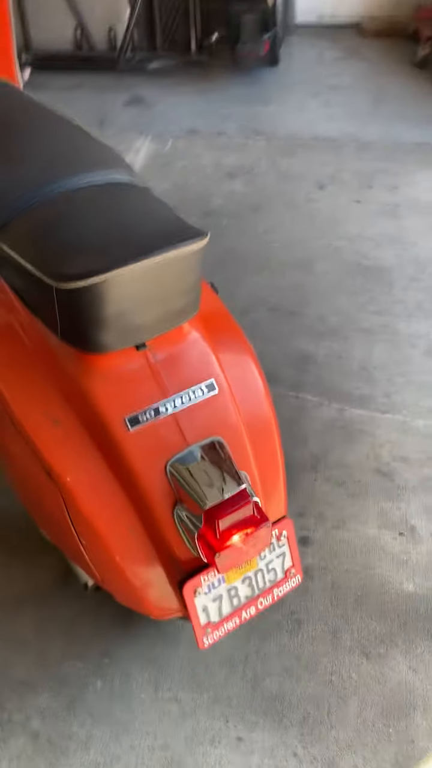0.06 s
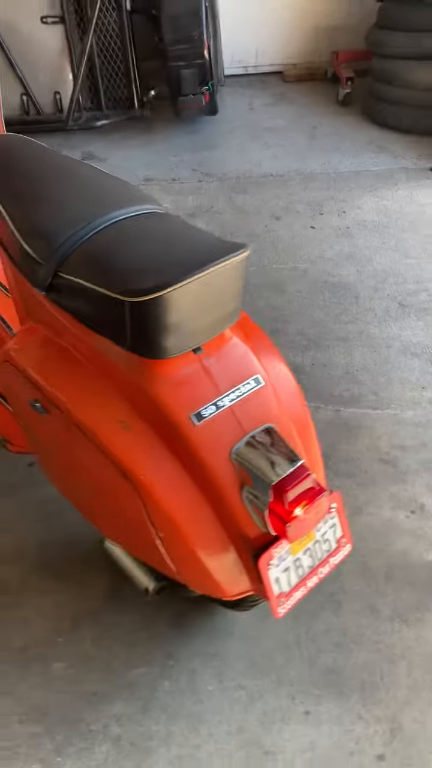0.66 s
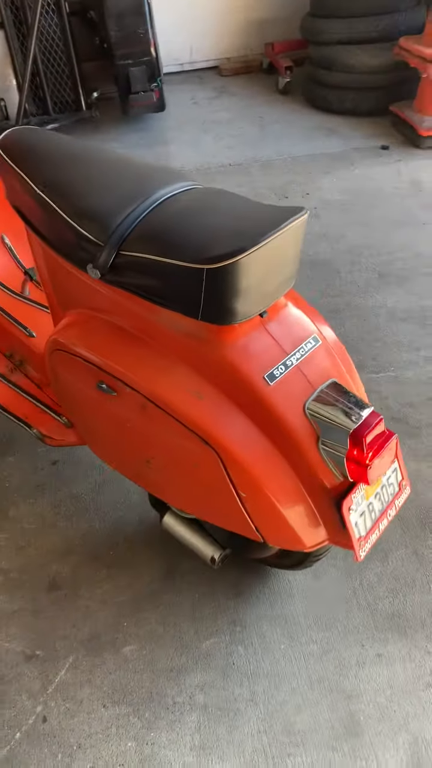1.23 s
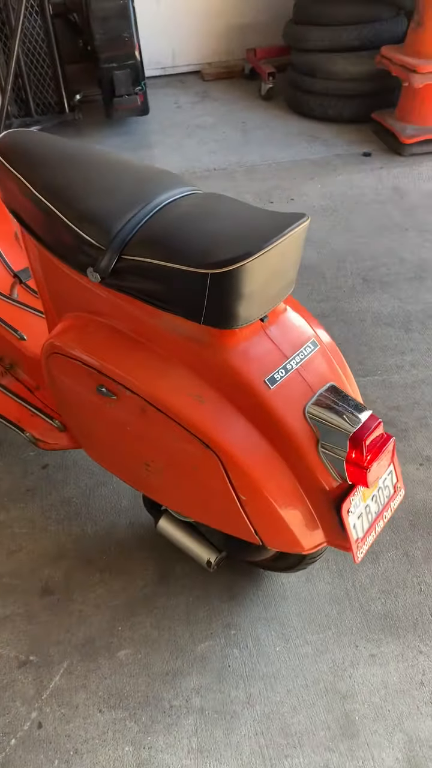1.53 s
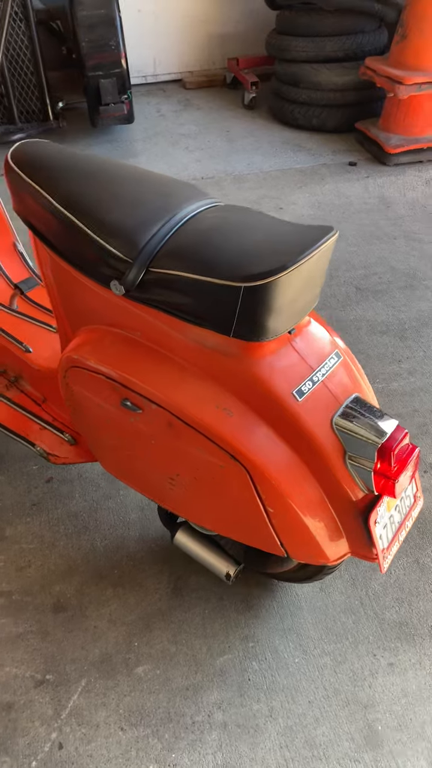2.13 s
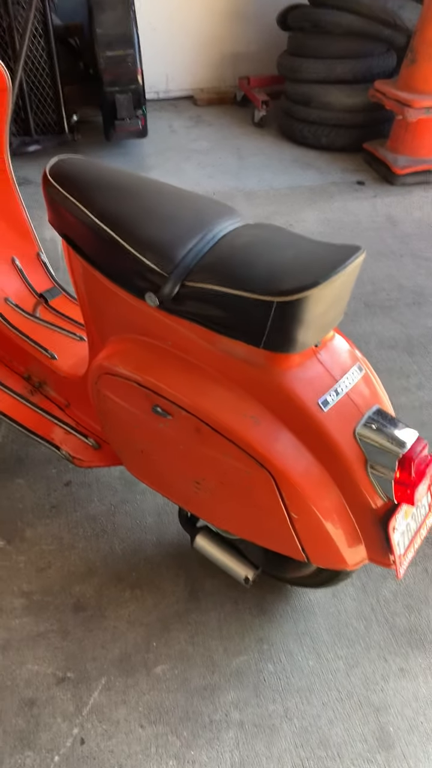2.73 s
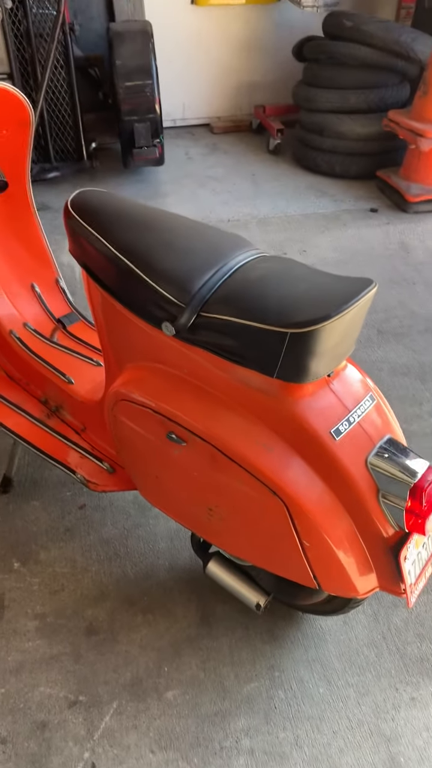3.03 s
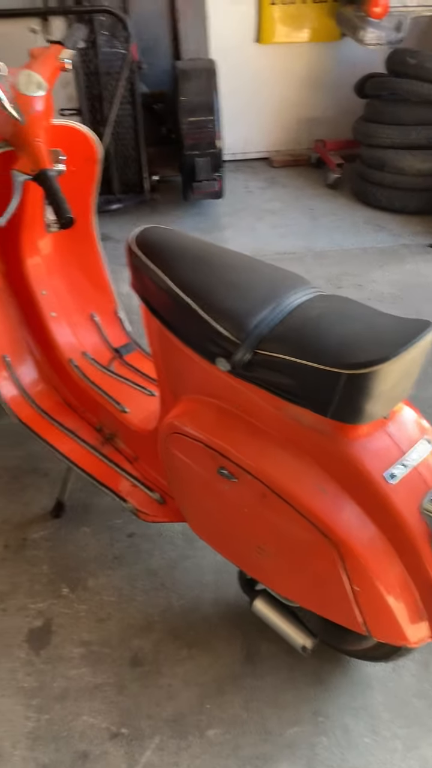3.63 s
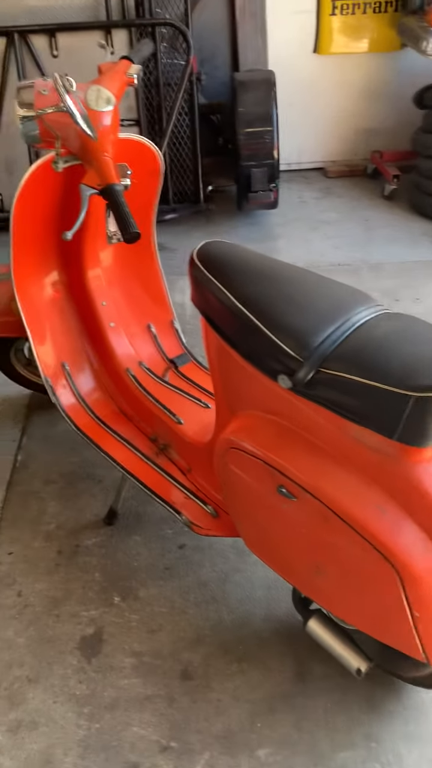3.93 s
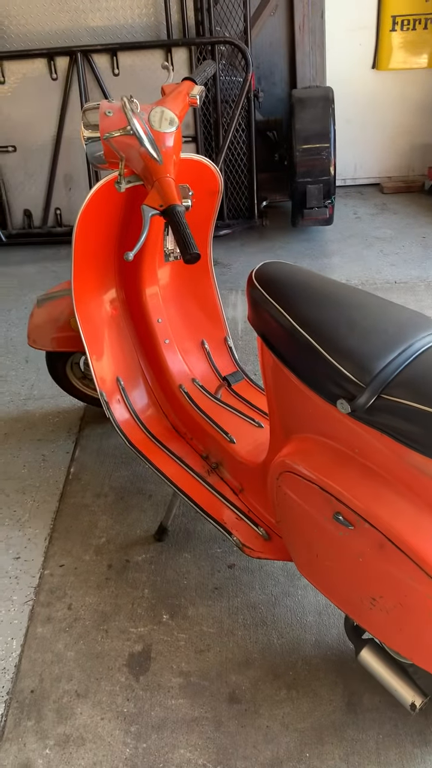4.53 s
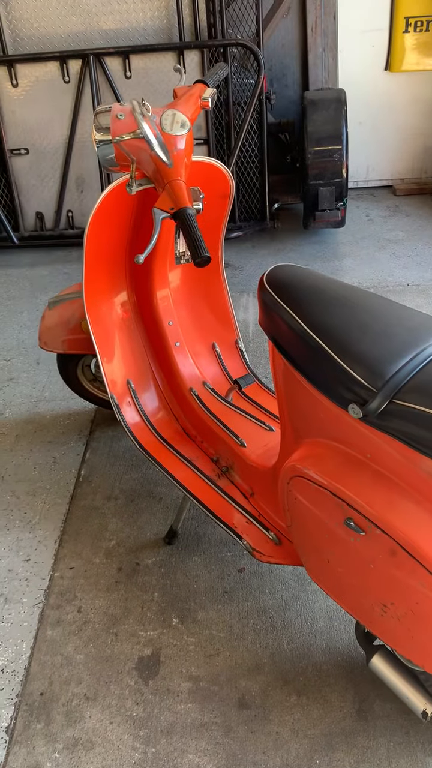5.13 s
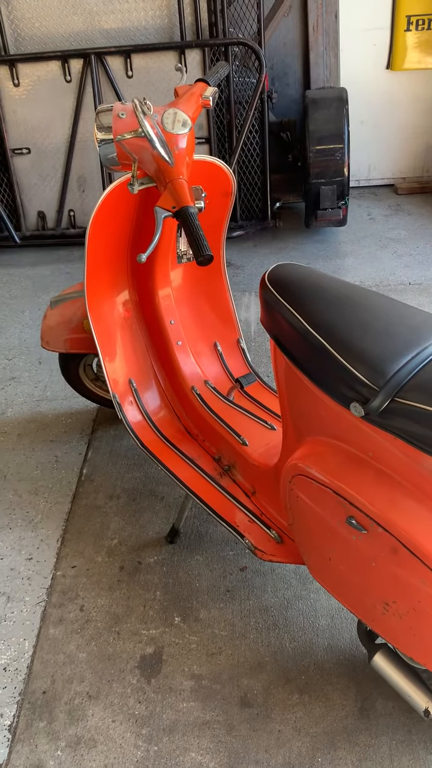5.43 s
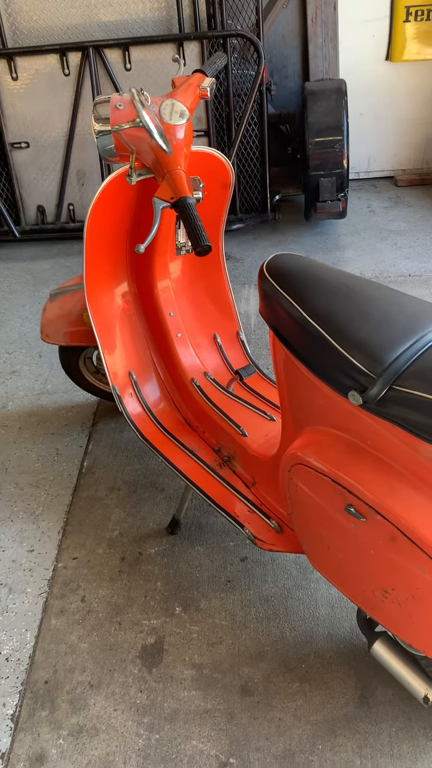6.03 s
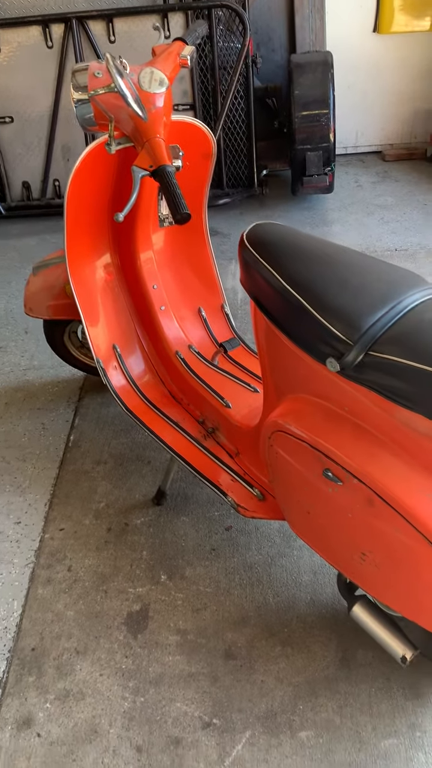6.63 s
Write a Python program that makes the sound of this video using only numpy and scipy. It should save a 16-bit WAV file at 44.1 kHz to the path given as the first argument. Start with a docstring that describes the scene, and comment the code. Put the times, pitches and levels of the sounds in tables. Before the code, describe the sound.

Close by, a two-stroke scooter engine ticks over with a ragged, sputtering pop from the tailpipe, backed by metallic knocking and fan noise. The garage answers with a low boom and short, dull echoes. As the microphone travels from the rear round to the side, the bass changes colour and widens, and a faint, high rattle comes and goes. The idle keeps the same speed throughout.

```python
"""Scooter idling in a garage

A small two-stroke scooter idles while a phone moves from behind it round to its side.
The crank turns about 26 times a second but only some turns fire: each firing pops through
the exhaust with a bark and a spit of gas. Piston and cooling fan clatter on, a loose part
buzzes, and the garage booms along."""
import sys
import numpy as np
from scipy import signal
from scipy.fft import rfft, irfft
from scipy.io import wavfile
from scipy.ndimage import uniform_filter1d

SR = 44100
rng = np.random.default_rng(int(sys.argv[2]) if len(sys.argv) > 2 else 0)


def generate_wav(sig):
    """Save sig (samples, or channels by samples) to the path in sys.argv[1] as 16-bit PCM at SR."""
    pcm = np.round(np.clip(np.atleast_2d(sig).T, -1, 1) * 32767).astype(np.int16)
    wavfile.write(sys.argv[1], SR, pcm)


N = 298557
TIME = np.arange(N) / SR
TURN_S = .0386  # one turn of the crank
SIZE = 65536  # filter length in samples
FREQ = np.arange(SIZE // 2 + 1) * SR / SIZE


def undb(db):
    """Turn decibels into a gain to multiply by."""
    return 10 ** (np.asarray(db) / 20)


def unit(x):
    """Scale a signal to an average (rms) level of 1."""
    return x / np.sqrt(np.mean(x ** 2))


def through(x, response):
    """Filter a sound by a frequency response, one row for each channel."""
    taps = np.roll(irfft(np.atleast_2d(response)), SIZE // 2, axis=1)
    filtered = signal.fftconvolve(np.atleast_2d(x), taps, axes=1)
    return np.squeeze(filtered[:, SIZE // 2:SIZE // 2 + N])


def colour(points):
    """Gain at every frequency, from (frequency [Hz], level [dB]) points."""
    hz, db = np.transpose(points)
    return undb(np.interp(np.log(FREQ + 1), np.log(hz), db))


def noise(points):
    """Noise with the given tone colour, at an average level of 1."""
    return unit(through(rng.standard_normal(N), colour(points)))


def resonance(hz, width):
    """Response of something that rings at one pitch, with gain 1 there."""
    return 1j * FREQ * width / (hz ** 2 - FREQ ** 2 + 1j * FREQ * width)


def strikes(times, sizes):
    """One sharp kick at each time."""
    return np.bincount(np.clip(times * SR, 0, N).astype(int), sizes, minlength=N + 1)[:N]


def swell(rise_ms):
    """A loudness curve that climbs to 1 and dies away."""
    progress = TIME[:SR // 4] * 1000 / rise_ms
    return progress * np.exp(1 - progress)


def ring(hz, rise_ms):
    """A tone that swells through the silencer's chambers and dies within a few cycles."""
    return swell(rise_ms) ** 3 * np.sin(2 * np.pi * hz * TIME[:SR // 4])


def play(kicks, shape):
    """Every kick sets off the same shape."""
    return signal.fftconvolve(kicks, shape)[:N]


def place_at(times):
    """Where the phone is: 0 behind the scooter, 1 at its corner, 2 and up beside it."""
    # the walk round the scooter: (time [s], place)
    walk = [(0, 0.047), (2.9, 0.28), (3.5, 0.46), (4.0, 0.58), (4.5, 1.4), (5.0, 1.82), (6.77, 2.49)]
    return np.interp(times, *np.transpose(walk))


def rumble(level_db=-38, db_per_place=-2):
    """Low sound that has bounced round the garage many times, fainter beside the scooter."""
    # (frequency [Hz], relative level [dB])
    tone = [(25, -20), (42, -3.5), (60, -1), (90, -4), (130, 4), (170, -2), (230, 1), (310, -1),
            (500, -24), (1500, -84)]
    return undb(level_db + db_per_place * place_at(TIME)) * noise(tone)


def reverberation(x, apart_hz=1100, stretches=14, fade_s=.38):
    """The garage rings on, changing as the phone moves; left and right are alike only in the bass."""
    # (frequency [Hz], level [dB])
    tone = colour([(100, -4.5), (330, -1.5), (480, -5.5), (800, -4), (1400, -11.5), (2400, 4.5),
                   (3300, 3), (4500, -10.5), (6500, -8.5), (10000, -21.5), (15000, -14)])
    fade = np.exp(-np.log(1000) * TIME[:SIZE // 2] / fade_s)  # 60 dB down after fade_s
    apart = np.minimum(FREQ / apart_hz, 1) * np.array([[1], [-1]])
    hop = N // stretches + 1
    out = np.zeros((2, N + 2 * SIZE))
    for centre in range(0, N + hop, hop):  # each overlapping stretch gets its own tail
        span = np.arange(max(centre - hop, 0), min(centre + hop, N))
        tail = rng.standard_normal((2, len(fade))) * fade
        mid, side = rfft(unit(tail) / np.sqrt(2 * len(fade)), SIZE) * tone
        stretch = x[span] * np.cos(np.pi / 2 * (span - centre) / hop)
        out[:, span[0]:span[0] + SIZE] += irfft(rfft(stretch, SIZE) * (mid + apart * side))
    return out[:, :N]


def walls(x, dull_hz=557):
    """The walls boom at some pitches and throw back dull echoes; both change from place to place."""
    # standing waves, the garage's own notes:
    # (pitch [Hz], width [Hz], level behind [dB], at the corner [dB], beside [dB])
    waves = [(54.6, 2.6, 2.5, 2.5, 11.5), (75.5, 5.5, 9.5, 14, 12), (98, 22, 0, -11, 3.5),
             (117.7, 6.6, 4, 9.5, 3.5), (147.3, 23.5, 8, 10.5, -4), (173.2, 2.8, 11, 17, -30),
             (198.6, 5, 20.5, 13.5, -23), (236, 3.3, 16, 8.5, -24), (277.4, 2.1, -8, 12, 4),
             (310.9, 3.64, 3.5, 14, 7), (348.3, 6.1, -10, 2, 4), (555, 14, -3, 10.5, -8),
             (729, 14, 7, 10, 17)]
    # wall echoes: (delay [s], level behind [dB], at the corner [dB], beside [dB])
    echoes = [(0.0093, -9.5, -17.0, -16.0), (0.0229, -13.5, -6.5, -14.5), (0.0299, -7.5, -15.5, -20.0),
              (0.0343, -15.0, -15.5, -14.5), (0.0425, -18.5, -14.0, -22.5), (0.047, -16.0, -10.5, -17.0),
              (0.0525, -15.0, -12.0, -30.5), (0.0719, -16.0, -18.0, -19.0), (0.0817, -11.5, -22.0, -19.0),
              (0.0896, -19.0, -12.5, -24.0), (0.0983, -21.5, -14.0, -19.5), (0.1033, -18.0, -11.5, -16.0)]
    treble_loss = 1 / (1 + 1j * FREQ / dull_hz)
    place = np.clip(place_at(TIME), 0, 2)
    out = 0
    for spot in range(3):
        boom = sum(undb(db[spot]) * resonance(hz, width) for hz, width, *db in waves)
        slap = sum(undb(db[spot]) * np.exp(-2j * np.pi * FREQ * delay) for delay, *db in echoes)
        nearness = np.maximum(1 - abs(place - spot), 0)
        out = out + nearness * through(x, boom + slap * treble_loss)
    return out


def dead_spot(x, hz=184, width_hz=62, depth=0.98):
    """Beside the scooter one standing wave cancels, and the bass swings opposite ways left and right."""
    # (frequency [Hz], boost [dB])
    opposed = [(50, 10), (100, 16.5), (150, 11.0), (220, 11.0), (270, -6), (500, -6)]
    beside = np.clip(place_at(TIME) - 1, 0, 1) ** 2
    wave = resonance(hz, width_hz)
    side = through(x.mean(axis=0), wave * colour(opposed)) * np.array([[1], [-1]])
    return x - depth * beside * through(x, wave) + beside * side


def microphones(x):
    """Left and right carry the same sound out of step, by an amount that changes with pitch."""
    # how far the left channel is ahead: (frequency [Hz], phase [radians])
    left_lead = [(0, 0), (130, -.35), (280, -.68), (500, -.6), (1400, -.6), (2100, .5), (3500, .2),
                 (4100, -.7), (4650, -3.14), (16000, 13.7)]
    lead = np.interp(FREQ, *np.transpose(left_lead))
    lead = lead - .35 * np.sin(2 * lead) * (FREQ > 4650)  # treble leans to in step or opposite
    return through(x, np.exp(.5j * np.array([lead, -lead])))


def loose_part(buzz_db=1, scatter_db=4.0, count=500):
    """A loose part chatters in small, uneven ticks."""
    # tone of the buzz: (frequency [Hz], relative level [dB])
    tone = [(3000, -35), (6000, 1.5), (8000, 11.5), (11000, 9.5), (15500, -4)]
    # how the buzz comes and goes: (time [s], relative level [dB])
    levels = [(0.0, -76), (0.75, -77), (1.02, -68.5), (2.71, -53), (3.0, -63), (4.73, -48), (4.92, -59),
              (6.35, -56), (6.77, -68)]
    ticks = strikes(rng.uniform(0, N / SR, count), undb(scatter_db * rng.standard_normal(count)))
    chatter = unit(play(ticks, swell(rise_ms=3.8)) * noise(tone))
    return chatter * undb(buzz_db + np.interp(TIME, *np.transpose(levels)))


def crank(fired):
    """Times of all crank turns, and of the turns that fail to fire."""
    anchors = np.r_[fired[0] - TURN_S, fired, fired[-1] + 2 * TURN_S]
    turn_number = np.r_[0, np.cumsum(np.round(np.diff(anchors) / TURN_S))]
    every = np.arange(turn_number[-1])
    turns = np.interp(every, turn_number, anchors)
    return turns, turns[~np.isin(every, turn_number[1:-1])]


def fan(turns, level_db=-34.5, throb=0.0078):
    """The cooling fan churns the air, throbbing very slightly with each crank turn."""
    # rush of air: (frequency [Hz], relative level [dB])
    tone = [(25, -30), (50, -10), (120, -30), (200, -59), (380, 8), (600, -0.5), (1250, -9.5), (1700, -13),
            (2600, -21.5), (3800, -22), (5000, -30), (6000, -29), (7700, -35.5), (9000, -39), (15500, -53)]
    angle = 2 * np.pi * np.interp(TIME, turns, np.arange(len(turns)))
    return undb(level_db) * noise(tone) * (1 + throb * np.cos(angle))


def piston(turns, fired, knock_db, level_db=-35, scatter_db=2.6, jolt_db=9, lead_s=0.0043):
    """The piston knocks at both ends of its stroke; each firing jolts the metal just before its pop."""
    # ringing of cylinder fins and body panels: (pitch [Hz], width [Hz], relative level [dB])
    metal_notes = [(728.8, 42.5, 5.5), (973, 107, 3), (1041.6, 48, 6), (1170, 172, 4), (1371, 78, 4.5),
                   (1590, 240, -3.5), (1814, 51, -3.5), (2035, 140, -6), (2489, 64, -11), (2830, 97, -14),
                   (3223, 460, -18.5), (3690, 310, -20.5), (6120, 78, -18), (6580, 78, -25),
                   (7500, 270, -33)]
    # squaring narrows each peak
    metal = sum(undb(db) * resonance(hz, width) ** 2 for hz, width, db in metal_notes)
    stroke_ends = np.r_[turns, turns + TURN_S / 2]
    knocks = strikes(stroke_ends, undb(scatter_db * rng.standard_normal(len(stroke_ends))))
    jolts = strikes(fired - lead_s, undb(jolt_db + knock_db))
    blows = play(knocks, swell(rise_ms=5.5)) + play(jolts, swell(rise_ms=3.05))
    return undb(level_db) * unit(through(blows * rng.standard_normal(N), metal))


def pumping(missed, chug_db=-23, note_db=-31, side_db=-3.5, lag_s=0.0021, scatter_db=1.9):
    """A turn that does not fire still pumps a soft puff through the exhaust, fainter from the side."""
    place_db = side_db * np.minimum(place_at(missed), 1)
    puffs = undb(scatter_db * rng.standard_normal(len(missed)) + place_db)
    chug = play(strikes(missed + lag_s, puffs), ring(hz=107.6, rise_ms=7.8))
    note = play(strikes(missed, puffs), ring(hz=278, rise_ms=2.06))
    return undb(chug_db) * chug + undb(note_db) * note


def gas_bark(times, knock_db, level_db=-19, growth=0.88):
    """Gas bursts from the tailpipe with a throaty bark, louder when the firing knocks harder."""
    # tone of the bark: (frequency [Hz], relative level [dB])
    tone = [(200, 11.5), (400, 9.5), (620, 4), (850, -10), (1250, 1.5), (1700, -12.5), (2600, -18.5),
            (4500, -28.5), (9000, -88)]
    bursts = strikes(times, undb(level_db + growth * knock_db))
    return play(bursts, swell(rise_ms=4.32)) * noise(tone)


def gas_spit(times, hiss_db, boost_db=3.0, soft_db=-47, ragged_db=2.2, attack_ms=1.35, hold_ms=14.1):
    """On hard firings the gas leaves in a short, ragged spit that shuts off quickly."""
    # hiss of the gas: (frequency [Hz], relative level [dB])
    tone = [(1500, -48), (3500, -3), (5000, 5), (6200, 3), (8000, -2.5), (9000, -0.5), (11000, -4.5),
            (15500, -6)]
    ms = 1000 * TIME[:SR // 8]
    burst = (1 - np.exp(-ms / attack_ms)) / (1 + (ms / hold_ms) ** 4)
    eddies = undb(ragged_db * unit(uniform_filter1d(rng.standard_normal(N), size=60)))
    cut_db = 1.5 * np.minimum(hiss_db - soft_db, 0)  # soft firings hardly spit at all
    spits = strikes(times, undb(boost_db + hiss_db + cut_db))
    return play(spits, burst) * eddies * noise(tone)


def exhaust(fired, pop_db, hiss_db, middling_db=-42.0, lead_s=0.00096):
    """Each firing sends a pressure pulse that rings the exhaust; harder ones shift its mix of notes."""
    # notes of the exhaust: (pitch [Hz], swell time [ms], growth [dB per dB of gas hiss],
    # level behind [dB], at the corner [dB], beside [dB])
    notes = [(332, 3.48, 0.4062, -4.5, -4, -2.5), (121.2, 8.4, 0.55, -12.0, -16, -17.5),
             (77.04, 11.9, 0.07, -26.5, -29.5, -30.5), (596, 2.05, 0.4, -27.5, -18, -30),
             (227.8, 22.3, 0.79, -29.5, -17, -25)]
    place = place_at(fired)
    hardness_db = hiss_db - middling_db
    out = 0
    for hz, rise_ms, growth, *db in notes:
        place_db = np.interp(place, [0, 1, 2], db)
        pulses = strikes(fired - lead_s, undb(pop_db + growth * hardness_db + place_db))
        out = out + play(pulses, ring(hz, rise_ms))
    return out


def scene():
    """The scooter and the garage's answer reach the moving phone in stereo."""
    # firings of the uneven idle: (time [s], pop level [dB], gas hiss [dB], knock [dB])
    firings = [(0.0375, -7, -45.5, -5.5), (0.0785, -6.5, -44, -3.5), (0.1605, -4.5, -47.5, -5),
               (0.2007, -6.5, -54, -14), (0.2412, -5, -50.5, -11), (0.281, -7.5, -57, -6),
               (0.3226, -8.0, -57, -14), (0.3629, -6.5, -40, -5.5), (0.443, -6.5, -56, -9.0),
               (0.4836, -5, -47.0, -7), (0.5638, -7, -44.5, -13), (0.6447, -5.5, -57, -16),
               (0.6841, -6.5, -44.5, -2.5), (0.7653, -3, -61, -19), (0.8051, -7.5, -38.5, -3),
               (0.9229, -8, -36.5, -1), (1.0422, -10, -31.5, -1), (1.1609, -8, -36.5, -2),
               (1.2414, -7, -41, -6), (1.3216, -9, -35.5, -1.5), (1.401, -7.5, -46, -8),
               (1.441, -4.5, -51.0, -6), (1.4801, -5.5, -41.5, -4.5), (1.599, -9.5, -32.5, -1.5),
               (1.6777, -4.5, -52, -8), (1.7178, -6.0, -47.0, -5), (1.7567, -3, -59, -37),
               (1.7955, -5.5, -47.5, -6.5), (1.8334, -4, -46.5, -5.5), (1.9504, -9, -36, 0),
               (2.0285, -5, -45, -5), (2.0666, -5.5, -42.5, -6), (2.1827, -10, -31.0, -1.0),
               (2.297, -4.5, -47, -7), (2.3355, -6.5, -42, -5.5), (2.3727, -8.0, -68, -10.5),
               (2.411, -4, -54, -9.0), (2.4494, -6.5, -40.5, -3.5), (2.5642, -5, -47, -3.5),
               (2.642, -8.5, -33.5, -7), (2.7572, -7.0, -46, -18), (2.7964, -7, -38.5, -3.0),
               (2.8766, -8.5, -54, -13), (2.9136, -9, -32.5, 0.5), (3.0282, -5, -54, -7.5),
               (3.0673, -9.5, -34, -0.5), (3.1467, -9, -53, -15.0), (3.183, -9.5, -34, -0.5),
               (3.2981, -6.5, -43.5, -6), (3.3368, -4, -49.5, -5), (3.3747, -5.5, -50, -21),
               (3.4129, -9, -56, -23), (3.4514, -5.5, -40.5, -3), (3.5278, -1, -57.5, -19),
               (3.566, -3.5, -55, -15.5), (3.6047, -5.5, -44, -10), (3.6433, -7.5, -48, -22),
               (3.6815, -3.5, -54, -21), (3.7198, -5.0, -48, -10.0), (3.7585, -6, -56, -11),
               (3.7963, -6.5, -40.5, -8.5), (3.8727, 0, -60.0, -26), (3.9104, -7, -40.5, -10),
               (3.9864, -7.5, -39.5, -9.5), (4.0617, -6.5, -52.5, -23), (4.0995, -8, -35, -2),
               (4.211, -9.5, -38.0, -3), (4.2481, -6.5, -50, -19), (4.2849, -6.5, -48.5, -24),
               (4.3219, 0, -59, -16), (4.359, -6.5, -41.5, -6.5), (4.4723, -8, -38, -3),
               (4.5097, -9.5, -48.5, -20), (4.548, -4.0, -52, -20), (4.5859, -10.0, -34.5, -2.5),
               (4.7367, -12.0, -29, -1), (4.8505, -5.5, -49.5, -14), (4.889, -8.0, -35.5, -7),
               (5.0041, -10.0, -32, 0), (5.1547, -10.5, -30.5, -0.5), (5.2675, -6, -45.5, -7),
               (5.3447, -8.5, -37, -7), (5.422, -4, -63, -21), (5.462, -9, -33.5, -4),
               (5.5811, -4, -53.0, -12), (5.6193, -9, -36, 1), (5.7357, -6, -48.5, -9.0),
               (5.7717, -8, -38.5, -4.5), (5.8877, -10.5, -34.5, -3.5), (5.9675, -2.5, -61, -14),
               (6.004, -7.5, -37.0, -2.0), (6.0841, -6, -48, -6.5), (6.1203, -8.5, -39.5, -4),
               (6.2389, -5.5, -58, -35), (6.2752, -10.5, -32.0, -2.5), (6.3939, -7, -48, -10),
               (6.4304, -7, -42, -8.5), (6.5097, -7.5, -45, -9), (6.5488, -7.0, -49.5, -19),
               (6.5879, -7.0, -40, -6), (6.7045, -9, -36.5, -6.5)]
    fired, pop_db, hiss_db, knock_db = np.transpose(firings)
    turns, missed = crank(fired)
    pops = exhaust(fired, pop_db, hiss_db) + pumping(missed)
    gas_times = fired - 0.0034  # the gas starts just ahead of the pop
    gas = gas_bark(gas_times, knock_db) + gas_spit(gas_times, hiss_db)
    scooter = pops + gas + piston(turns, fired, knock_db) + fan(turns) + loose_part()
    garage = walls(pops) + reverberation(scooter - .5 * pops) + rumble()
    return dead_spot(microphones(scooter + garage))


def record(dry, low_hz=35, top_hz=15800):
    """The phone cuts the deepest rumble and the highest treble."""
    trimmed = signal.sosfilt(signal.butter(4, low_hz, "high", fs=SR, output="sos"), dry)
    return signal.sosfilt(signal.ellip(8, .2, 80, top_hz, fs=SR, output="sos"), trimmed)


dry = scene()
out = record(dry)
generate_wav(out)
```